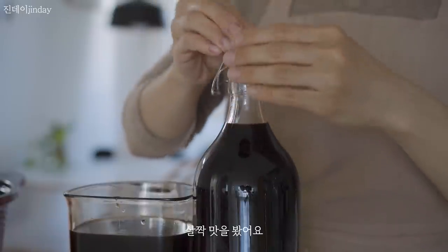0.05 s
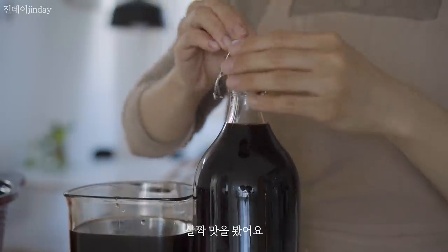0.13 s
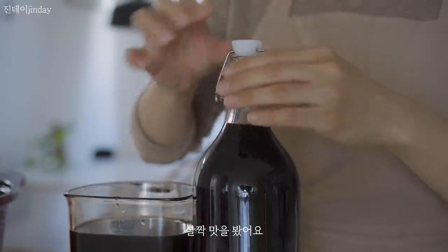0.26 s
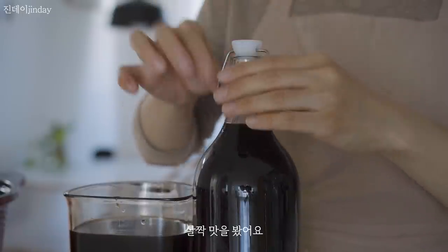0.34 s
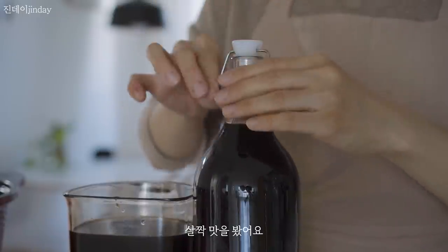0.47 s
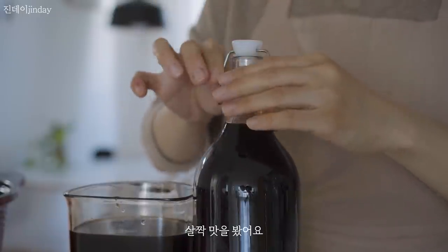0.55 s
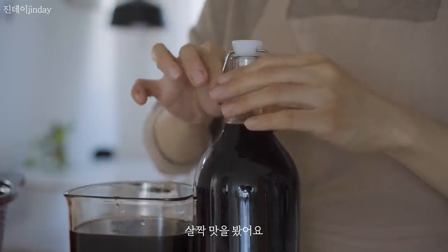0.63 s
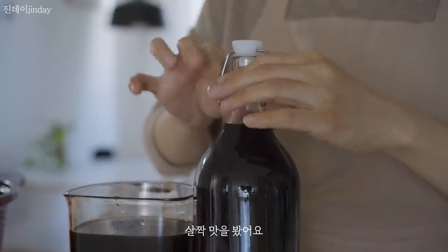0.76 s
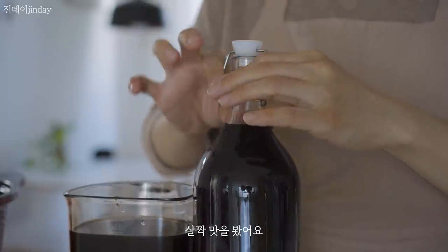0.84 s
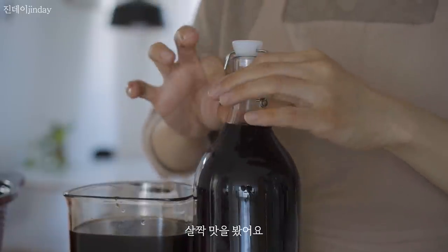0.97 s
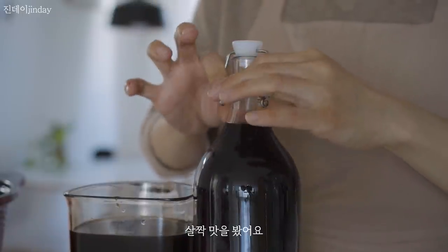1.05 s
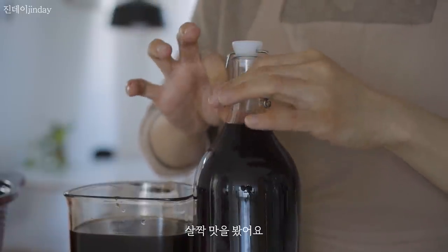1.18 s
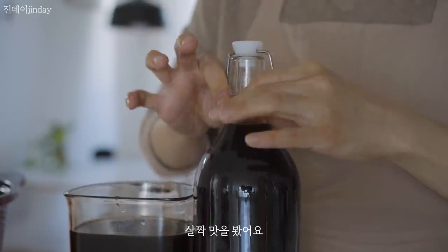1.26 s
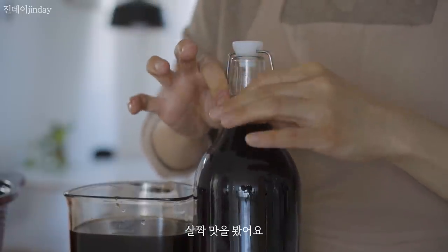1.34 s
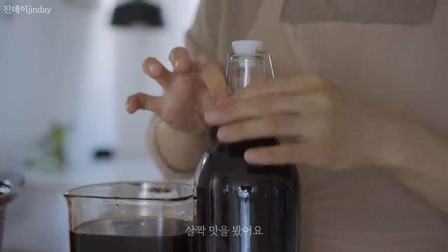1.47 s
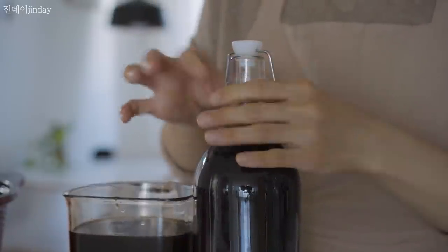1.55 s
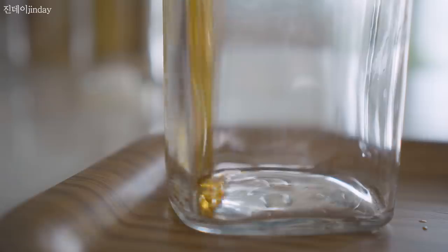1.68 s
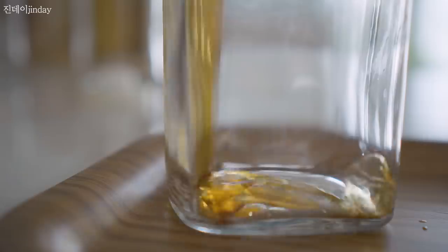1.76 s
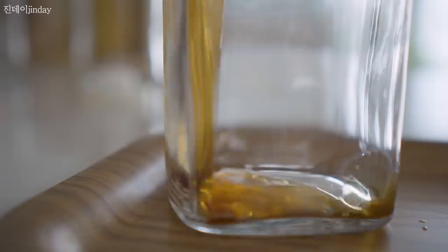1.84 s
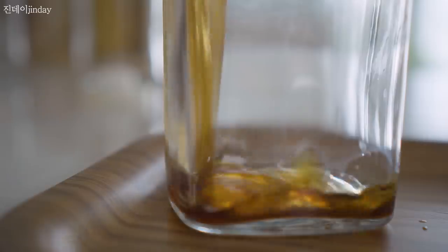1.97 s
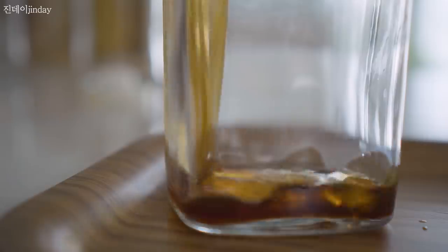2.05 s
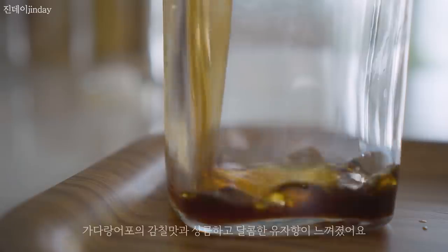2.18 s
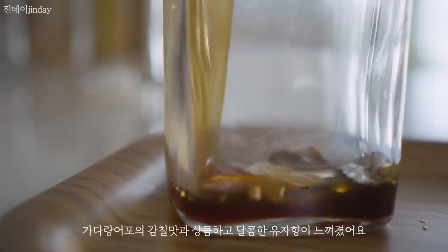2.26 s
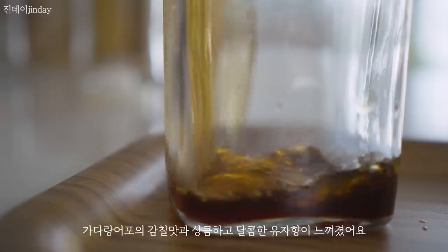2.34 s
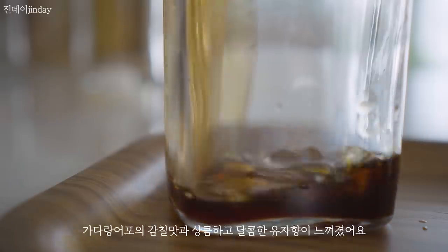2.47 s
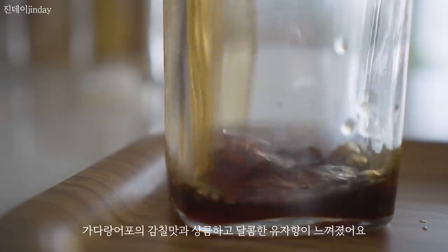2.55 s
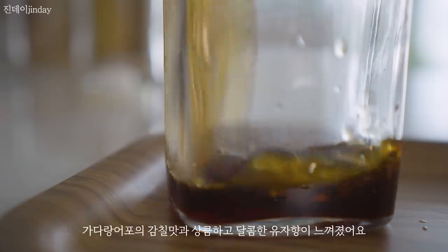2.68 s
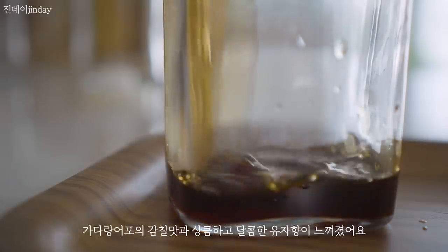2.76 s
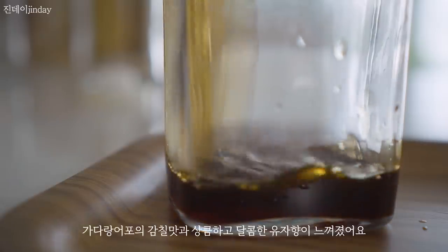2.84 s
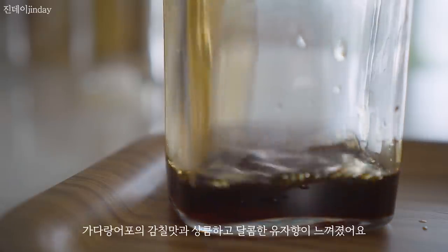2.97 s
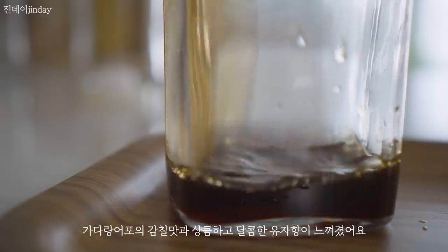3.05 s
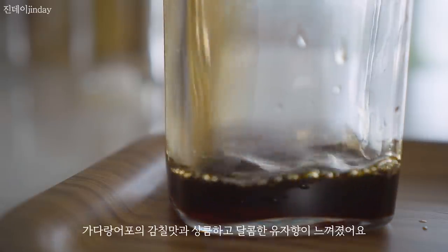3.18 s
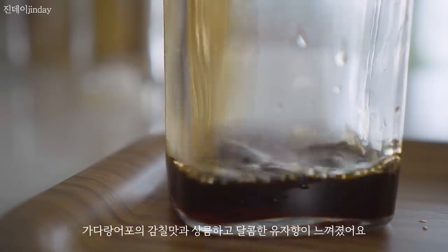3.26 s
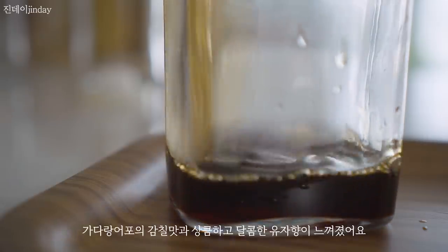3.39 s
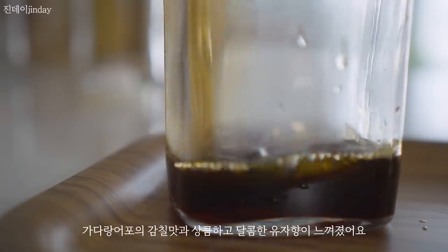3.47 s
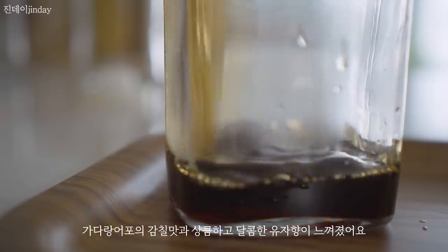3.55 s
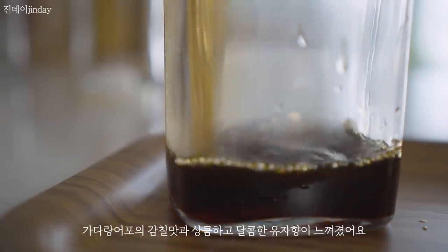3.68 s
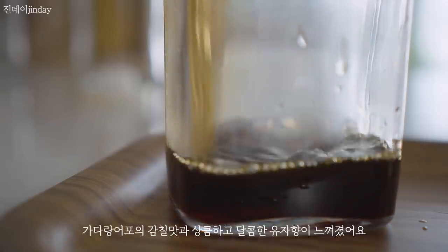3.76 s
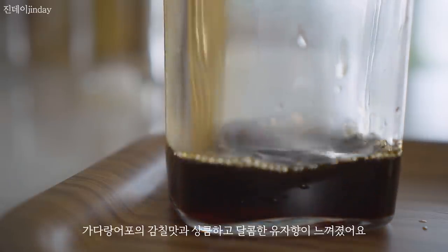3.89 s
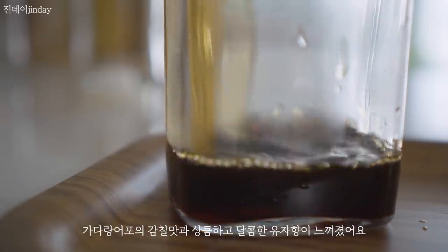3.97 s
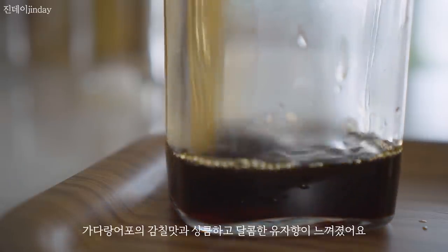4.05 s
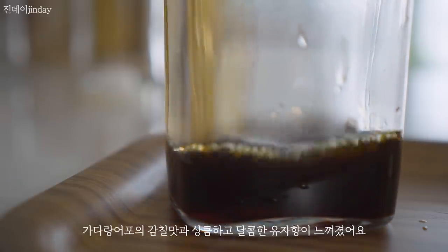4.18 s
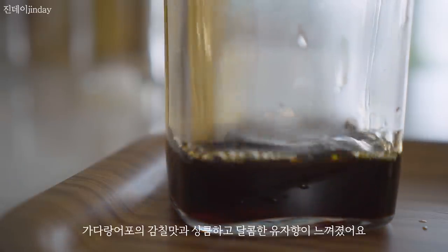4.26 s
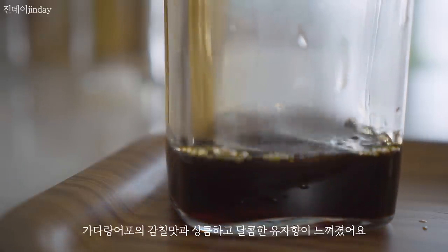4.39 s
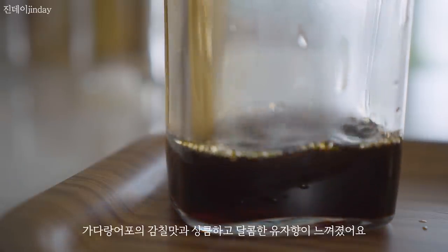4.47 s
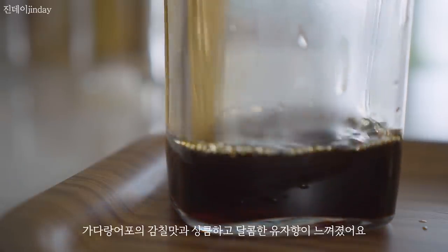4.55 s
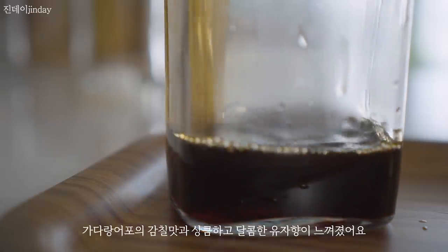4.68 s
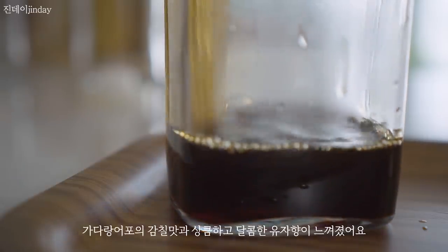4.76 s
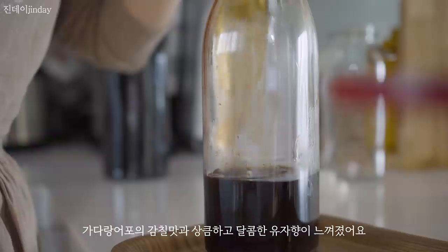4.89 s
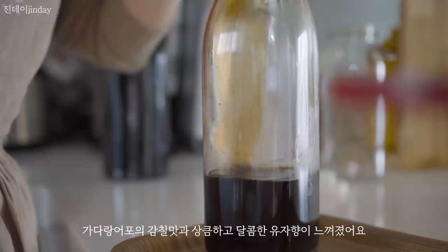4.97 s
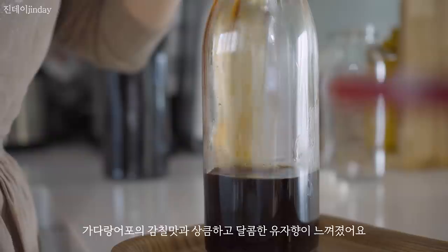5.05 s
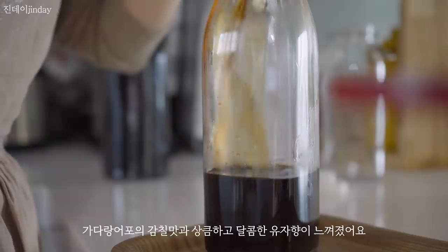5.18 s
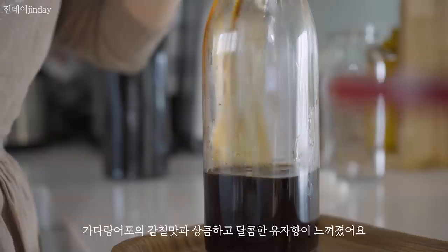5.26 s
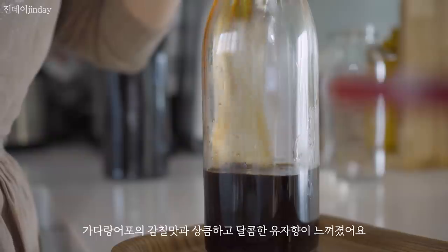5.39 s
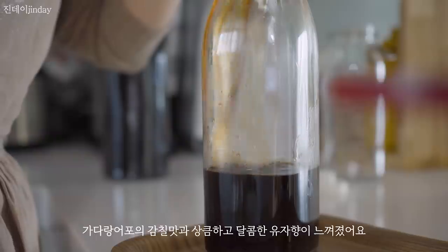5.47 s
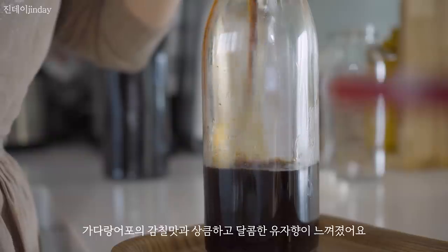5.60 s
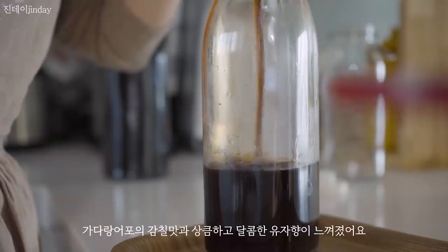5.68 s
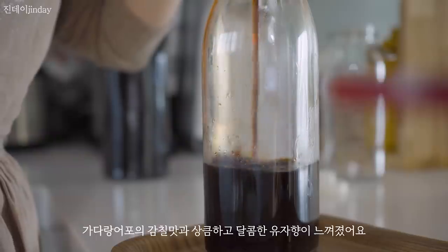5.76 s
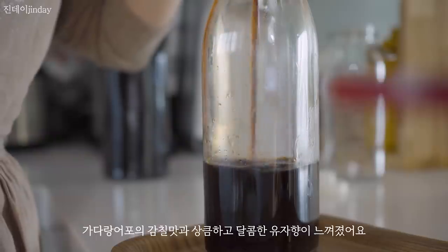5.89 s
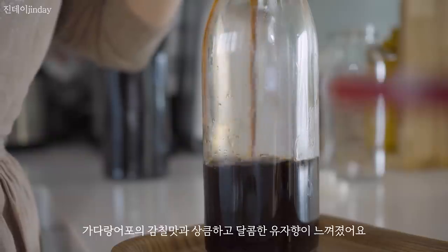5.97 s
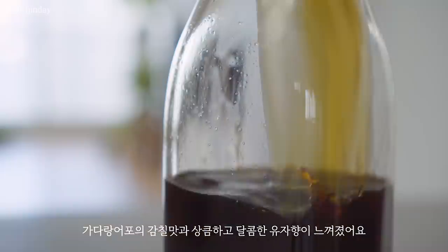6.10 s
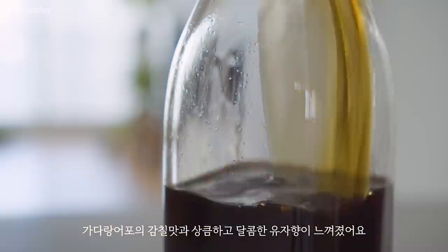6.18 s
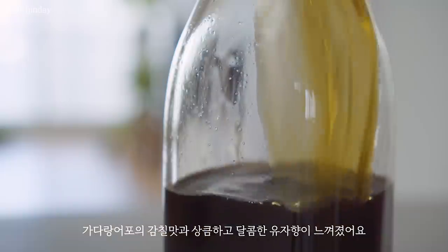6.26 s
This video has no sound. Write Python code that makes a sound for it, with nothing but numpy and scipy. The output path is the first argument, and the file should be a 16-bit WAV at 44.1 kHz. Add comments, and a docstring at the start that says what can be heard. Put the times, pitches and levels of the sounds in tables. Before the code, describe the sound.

A close, quiet kitchen with a low, wavering appliance hum. From 0 to 0.3 s fingers rub faintly on a bottle neck while thin wire ticks against glass, the brightest tick at about 0.26 s. Near silence follows until 1.29 s, when the clasp snaps shut: a hard, overloaded crack, by far the loudest sound, with a small thump, wiry buzz and clear glass ringing. Small clicks follow at 1.5 to 1.65 s. At 1.7 s the hum stops abruptly and liquid splats into an empty square bottle, with watery plinks, droplets, light fizz and hollow glassy resonance, continuing unevenly until 4.9 s. Then a taller bottle is filled: denser bubbling, rounder plops and brisk splashes, strongest from 5.5 to 6.15 s, where a low hollow boom swells under the stream, then drops away as lighter bubbling continues to the end at about 6.3 s.

```python
"""Sauce is poured into a square glass bottle, then into a taller one: a stream splats, bubbles plink and fizz.
Bubbles are gliding, dying sines; splashes are noise bursts with droplet swarms; resonators give the air above.
Before that, the wire clasp of a swing-top bottle is fiddled with and snaps shut against the glass: noise bursts
excite nothing but the ear, while clicks ring the glass modes. A low kitchen hum of wavering sine harmonics lies
under the clasp; coloured noise makes the room, one tone for the clasp and another for the pours."""
import sys
import numpy as np
from scipy import signal
from scipy.fft import rfft, irfft, next_fast_len
from scipy.io import wavfile

SR = 44100
rng = np.random.default_rng(int(sys.argv[2]) if len(sys.argv) > 2 else 0)


def file_out(sig):
    """Save sig as 16-bit WAV at sys.argv[1]."""
    # one column per channel
    cols = np.atleast_2d(sig).T
    # limit, then scale
    lim = np.clip(cols, -1, 1)
    pcm = np.round(lim * 32767).astype(np.int16)
    wavfile.write(sys.argv[1], SR, pcm)


N = 279153
TIME = np.arange(N) / SR


def from_db(db):
    """Amplitude ratio: 20 dB is a factor of ten."""
    return 10 ** (np.asarray(db) / 20)


def rms_one(x):
    """Normalisation to unit root-mean-square amplitude."""
    return x / np.sqrt(np.mean(x ** 2) + 1e-20)


def at_hz(points, hz):
    """Spectral interpolation: level in dB is linear in log frequency."""
    f, db = np.transpose(points)
    return np.interp(np.log(np.maximum(hz, 1)), np.log(f), db)


def noise(spectrum):
    """Spectral shaping: white noise is weighted in the frequency domain, rms 1."""
    size = next_fast_len(N)
    hz = np.arange(size // 2 + 1) * SR / size
    coloured = rfft(rng.standard_normal(size)) * from_db(at_hz(spectrum, hz))
    return rms_one(irfft(coloured, size)[:N])


def drift(rate):
    """Random modulation: a wander through `rate` random knots per second, rms 1."""
    knots = rng.standard_normal(2000)
    return rms_one(np.interp(TIME * rate, np.arange(len(knots)), knots))


def during(start, end):
    """Gating: 1 between two times, with 4 ms ramps against clicks."""
    return np.interp(TIME, [start - .004, start, end - .004, end], [0, 1, 1, 0])


def add(out, s, sound):
    """Superposition: a sound is summed in at its onset."""
    i = max(int(s * SR), 0)
    out[i:i + len(sound)] += sound[:max(N - i, 0)]


def blows(times, levels_db, t60=None):
    """Impulse excitation: a click at each time, or an exponential decay from there."""
    out = np.zeros(N)
    for s, db in zip(times, levels_db):
        add(out, s, from_db([db]))
    if t60 is None:
        return out
    decay = from_db(-60 / (t60 * SR))
    return signal.lfilter([1], [1, -decay], out + 1e-18)


def ring(drive, modes):
    """Modal synthesis: damped resonators in parallel, neighbours in opposite phase."""
    out = np.zeros(N)
    for k, (hz, db, t60) in enumerate(modes):
        radius, angle = from_db(-60 / (t60 * SR)), 2 * np.pi * hz / SR
        poles = [1, -2 * radius * np.cos(angle), radius ** 2]
        out += (-1) ** k * from_db(db) * signal.lfilter([0, np.sin(angle)], poles, drive + 1e-18)
    return out


def echoes(x, t60, dull_hz):
    """Diffuse reverberation: convolution with a unit-energy noise tail whose treble dies twice as fast."""
    t, white = TIME[:SR], rng.standard_normal(SR)
    low = signal.sosfilt(signal.butter(2, min(dull_hz, .45 * SR), fs=SR, output="sos"), white)
    tail = low * from_db(-60 * t / t60) + (white - low) * from_db(-60 * 2 * t / t60)
    tail *= t > .002  # the first reflection comes after 2 ms
    return signal.fftconvolve(x, tail / np.sqrt(np.sum(tail ** 2)))[:N]


# spectra of the room noise [f/Hz, relative level per Hz/dB] and their levels [rms level/dB]
CLASP_ROOM = [(12, -37), (20, -7), (47, 3), (125, -10), (166, -3), (281, -14.5), (361, -10.5), (596, -20.5),
              (745, -19.5), (1040, -26), (1870, -26), (3640, -33.5), (4300, -30.5), (15500, -50)]
POUR_ROOM = [(20, 1.5), (44, 4), (85, -8.5), (125, 0.5), (213, -15.5), (500, -10), (1200, -30.5),
             (3000, -38), (7000, -34.5), (15500, -58)]
CLASP_ROOM_DB, POUR_ROOM_DB = -48.5, -48
CLASP_END_S = 1.692


def clasp_room():
    """Stationary ambient noise: the coloured background around the clasp."""
    return from_db(CLASP_ROOM_DB) * noise(CLASP_ROOM)


def pour_room():
    """Stationary ambient noise: the coloured background around the pours."""
    return from_db(POUR_ROOM_DB) * noise(POUR_ROOM) * (TIME > CLASP_END_S)


# harmonics of the hum [multiple of the mains frequency, rms level before wavering/dB, rms waver/dB]
HUM = [(1, -44.5, 4), (2, -48.5, 0.6), (3, -55, -0.6), (4, -67.5, 1.5), (6, -60.5, 1.4)]
MAINS_HZ, HUM_WAVERS_PER_S = 60, 12
MOTOR_HZ, MOTOR_DB = 53, -49


def hum():
    """Harmonic series and beats: appliance harmonics waver in level; a slower motor beats with the lowest."""
    def line(hz):
        """Pure tone: a sine of rms 1 and random phase."""
        return np.sqrt(2) * np.sin(2 * np.pi * (hz * TIME + rng.random()))
    mains = np.zeros(N)
    for multiple, db, waver_db in HUM:
        mains += from_db(db + waver_db * drift(HUM_WAVERS_PER_S)) * line(round(multiple) * MAINS_HZ)
    return mains + from_db(MOTOR_DB) * line(MOTOR_HZ)


# modes of the glass bottle [f/Hz, relative level/dB, T60/s]
GLASS = [(964, -22, 0.53), (975, -22, 0.35), (1389, -13, 1.1), (2223, -8, 0.71), (2320, -5, 0.4),
         (3273, -18, 0.35), (3397, -8, 0.27), (3445, -6, 0.16), (3494, 0, 0.21), (3526, -6, 0.24),
         (4027, -18, 0.29), (4107, -11, 0.3), (4791, -19, 0.35), (5238, -14, 0.2), (5416, -24, 0.38),
         (5534, -19, 0.29), (5975, -31, 0.36), (6282, -17, 0.24), (6460, -24, 0.23), (7004, -46, 0.78),
         (7483, -29, 0.36), (7736, -30, 0.34), (8376, -23, 0.28), (8710, -18, 0.16), (9345, -20, 0.15),
         (10160, -23, 0.18), (10320, -26, 0.18), (11320, -30, 0.28), (12280, -23, 0.16), (13450, -15, 0.14),
         (13860, -13, 0.11)]
# buzz of wire on glass [f/Hz, relative level per Hz/dB]
BUZZ = [(150, -21), (700, -12), (1200, -21.5), (2100, 5), (2700, -8), (3400, 12), (3800, -15), (4150, -5.5),
        (4500, -8.5), (4850, 11), (5800, -17), (8400, -10), (13500, -20), (16000, -25.5)]
# light contacts of wire and glass [t/s, relative crack level/dB, relative glass ring level/dB]
CLASP = [(.001, -38.5, -47), (0.0382, -53, -42), (0.1038, -28.5, -37), (.169, -58, -51), (0.225, -33, -42),
         (0.237, -26.5, -49), (0.2612, -18.5, -41.5), (.476, -51, -60), (1.476, -26, -66),
         (1.5499, -20.5, -48), (1.623, -34, -52), (1.657, -41, -63)]


def wire_ticks():
    """Impact excitation: light contacts give bright noise bursts, glass modes and a buzz."""
    times, crack_db, ring_db = np.transpose(CLASP)
    # the thin wire alone is bright
    wire = noise([(500, -2), (2200, -18), (3100, 11.5), (4500, -11.0), (8000, -1.0), (15000, -16.5)])
    ticks = from_db(-6) * blows(times, crack_db, t60=0.016) * wire
    # the hand holding the glass damps its low modes
    touched = [(hz, db - 3.5 - 9 * (hz < 3000), t60 * 0.83) for hz, db, t60 in GLASS]
    ticks += ring(blows(times, ring_db), touched)
    return ticks + from_db(-8.5) * blows(times, ring_db, t60=0.16) * noise(BUZZ)


# crack of the snap [f/Hz, relative level per Hz/dB]
CRACK = [(200, -21.5), (900, -6.5), (1900, -9.5), (3000, 4.5), (4200, 1.5), (6000, -11.5), (9000, -4),
         (14000, -9.5), (16000, -18)]
# how strongly the snap reaches the glass modes [f/Hz, level added to the mode/dB]
SNAP_REACH = [(960, -6.5), (1400, -11.5), (2220, -10.5), (2320, -12), (3400, -12.5), (4100, -5.5),
              (4800, -5.5), (5500, -11.5), (8400, -11.5), (11000, -13), (13800, -13.5)]
SNAP_S, SNAP_CRACK_DB = 1.288, 6


def snap():
    """Impulse response: a hard crack, a brief wire buzz, a low thump and the ringing glass modes."""
    crack = blows([SNAP_S], [SNAP_CRACK_DB], t60=0.014) * noise(CRACK)
    buzz = blows([SNAP_S], [-16], t60=0.25) * noise(BUZZ)
    reached = [(hz, db + at_hz(SNAP_REACH, hz), t60) for hz, db, t60 in GLASS]
    glass = ring(blows([SNAP_S], [0]), reached)
    thump = ring(blows([SNAP_S], [-34]), [(72, -2, 0.36), (135, 1, 0.49)])
    return crack + buzz + glass + thump


def fingers():
    """Friction noise: fingers rub unevenly on the neck while they place the stopper."""
    skin = noise([(150, 1), (500, 1), (900, 4), (1500, -1), (4000, -13), (12000, -59)])
    return from_db(-53.5 + 4.5 * drift(43.0)) * during(0, .28) * skin


def clasp():
    """Direct and reverberant field: ticks, snap and rubbing are heard with their reflections."""
    direct = wire_ticks() + snap() + fingers()
    return direct + from_db(-15.5) * echoes(direct, t60=0.35, dull_hz=11050)


# boom of the tall bottle as the stream thickens [t/s, level/dB]
BOOM = [(5.5, -78), (5.58, -59), (5.72, -52), (5.8, -47), (5.87, -44), (6.14, -43.5), (6.17, -69)]
# low resonances of its neck and body [f/Hz, relative level/dB, T60/s]
BOOM_MODES = [(72.7, -2, 0.27), (300.5, 3, 0.13), (360, -6, .1), (680, -4, .08)]


def boom():
    """Forced resonance: uneven noise from the thick stream wakes the tall bottle's low modes."""
    level = from_db(np.interp(TIME, *np.transpose(BOOM), left=-120))
    drive = rng.standard_normal(N) * from_db(3.8 * drift(45))
    return level * rms_one(ring(drive, BOOM_MODES))


def bubble(hz, t60, rise, swell_cycles):
    """Bubble resonance: a sine swells, decays and climbs in pitch as the bubble nears the surface."""
    t = TIME[:int(t60 * SR) + 2]
    phase = 2 * np.pi * hz * t * (1 + rise * (t / t60 - .3) / 2)
    return np.sin(phase) * from_db(-60 * t / t60) * (1 - np.exp(-t * hz / swell_cycles))


def fizz(span, spectrum, low_hz, high_hz, per_s, spread_db, cycles):
    """Incoherent superposition: a swarm of random bubbles, larger ones gliding more; rms 1 in the span."""
    out, length = np.zeros(N), span[1] - span[0]
    when, size, strength, life = rng.random((int(per_s * length), 4)).T
    pitches = low_hz * (min(high_hz, .45 * SR) / low_hz) ** size
    # the factor of pitch offsets the log-spaced pitches and the shorter lives of small bubbles
    strength_db = spread_db * np.minimum(-np.log(strength), 2.5)
    gains = pitches * from_db(at_hz(spectrum, pitches) + strength_db)
    lives_s = cycles * (.5 + life) / pitches
    for s, hz, gain, t60 in zip(span[0] + when * length, pitches, gains, lives_s):
        add(out, s, gain * bubble(hz, t60, rise=25 / hz, swell_cycles=0.19))
    return rms_one(out) * np.sqrt(length * SR / N)


def within(span, rows):
    """Temporal windowing: the events whose onset lies in one pour."""
    return [row for row in rows if span[0] <= row[0] < span[1]]


LESSER_PER_S, LESSER_SPREAD_DB = 12, 1.5
LESSER_LOW_HZ, LESSER_HIGH_HZ = 1306, 7240


def lesser_events(stream):
    """Jittered point process: air is caught at uneven intervals, at levels that follow the bubbling."""
    s, _, bubbling_db, _ = np.transpose(stream)
    when, size, strength = rng.random((200, 3)).T
    times = s[0] + (np.arange(len(when)) + when) / LESSER_PER_S
    pitches = LESSER_LOW_HZ * (LESSER_HIGH_HZ / LESSER_LOW_HZ) ** size
    levels_db = np.interp(times, s, bubbling_db) + LESSER_SPREAD_DB * (2 * strength - 1)
    return np.array([times, pitches, levels_db])[:, times < s[-1]]


# large air bubbles caught by the stream [t/s, f/Hz, relative level/dB, T60/s]
PLOPS = [(1.771, 5500, -29, .025), (2.139, 1706, -41.5, 0.1), (2.2, 2036, -31, .035),
         (2.22, 2190, -22, .025), (2.316, 1076, -37.5, .04), (2.369, 814, -32.5, 0.04),
         (2.39, 866, -37, .045), (2.435, 2213, -25, 0.028), (2.477, 1480, -37.5, 0.032),
         (2.529, 2890, -35, 0.05), (2.57, 2860, -30, 0.064), (2.592, 1696, -34.5, 0.034),
         (2.61, 875, -36.5, 0.093), (2.744, 1380, -36.5, 0.024), (2.877, 2090, -30, 0.039),
         (2.895, 8180, -37, 0.035), (3.064, 2990, -33, 0.044), (3.291, 2261, -36, 0.024),
         (3.472, 4290, -35.5, 0.033), (3.592, 2245, -32, .03), (3.605, 2000, -34.5, 0.028),
         (3.692, 1670, -38, .03), (4.039, 1825, -31.5, .11), (4.141, 2090, -34, 0.037),
         (4.147, 3090, -31.5, 0.036), (4.169, 3120, -24, 0.024), (4.271, 950, -37.5, 0.035),
         (4.53, 4600, -34.5, 0.028), (4.677, 4230, -36.5, 0.071), (4.872, 1798, -36, .18),
         (4.94, 3100, -39, 0.036), (5.038, 5890, -33.5, 0.089), (5.173, 1020, -38.5, 0.027),
         (5.211, 1593, -29, .08), (5.232, 1940, -21.5, 0.024), (5.295, 1713, -30, 0.054),
         (5.41, 750, -37.5, .08), (5.47, 2927, -26.5, .045), (5.538, 2950, -30.5, 0.075),
         (5.559, 1627, -20, .05), (5.598, 687, -18, 0.031), (5.627, 1093, -24.5, .045),
         (5.646, 1137, -32, 0.058), (5.653, 640, -30.5, 0.038), (5.672, 2660, -24.5, 0.023),
         (5.715, 1660, -27, 0.04), (5.76, 1810, -32.5, 0.043), (5.801, 1760, -34, 0.037),
         (5.837, 291, -24.5, 0.052), (5.879, 1485, -26, 0.033), (5.999, 1504, -22.5, 0.065),
         (6.043, 3080, -22.5, 0.014), (6.087, 1491, -18, 0.048), (6.129, 661, -33, 0.058),
         (6.142, 1630, -33, .025), (6.169, 2020, -32, 0.033), (6.202, 3910, -38.5, 0.049),
         (6.239, 2720, -37, 0.056), (6.269, 1830, -27.5, .02)]
LESSER_PLOP_DB, LESSER_T60_S = 6, 0.058  # level relative to the lesser event


def plops(span, lesser, satellite_db):
    """Bubble fragmentation: each large bubble sheds three weaker ones of other sizes just after it."""
    out = np.zeros(N)
    rows = within(span, PLOPS)
    rows += [(s, hz, db + LESSER_PLOP_DB, LESSER_T60_S) for s, hz, db in zip(*lesser)]
    for s, hz, db, t60 in rows:
        add(out, s, from_db(db + 1.5) * bubble(hz, t60, rise=0.033, swell_cycles=2.26))
        for delay, size, strength in rng.random((3, 3)):
            other = bubble(hz * 2 ** (1.7 * (size - .5)), t60 * 0.63, rise=0.016, swell_cycles=0.79)
            add(out, s + .018 * delay, from_db(db + satellite_db - 8.1 * strength) * other)
    return out


SLAP_DB, SLAP_T60_S, SLAP_WIDTH_OCTAVES = -7.5, 0.019, 0.83  # level relative to the splash


def slaps(rows):
    """Band-limited impact noise: each slap is a very short hiss around a pitch of its own."""
    out, t = np.zeros(N), TIME[:SR // 20]
    for s, hz, db in rows:
        edges = np.clip(hz * 2 ** (SLAP_WIDTH_OCTAVES * np.array([-.5, .5])), 100, .45 * SR)
        band = signal.butter(2, edges, "band", fs=SR, output="sos")
        hiss = rms_one(signal.sosfilt(band, rng.standard_normal(len(t))))
        add(out, s, from_db(db + SLAP_DB - 60 * t / SLAP_T60_S) * hiss)
    return out


# the stream slaps the surface [t/s, centre f/Hz, relative level/dB]
SPLASHES = [(1.752, 5960, -33.5), (1.77, 5050, -22), (2.201, 3000, -29), (2.296, 5070, -30.5),
            (2.436, 3200, -31.5), (2.501, 5500, -33.5), (2.528, 3500, -36), (2.615, 4870, -28.5),
            (3.083, 5000, -23), (3.17, 6500, -39.5), (3.425, 4600, -29.5), (3.606, 3560, -37),
            (3.641, 6400, -29), (4.039, 2930, -31), (4.08, 4050, -27.5), (4.146, 3470, -27),
            (4.367, 5500, -30.5), (4.742, 4500, -36), (4.851, 4960, -31.5), (5.041, 5500, -33.5),
            (5.095, 3970, -28), (5.264, 4960, -23), (5.353, 7000, -31), (5.392, 4500, -31),
            (5.561, 4500, -22), (5.579, 6200, -29), (5.598, 6040, -28.5), (5.627, 3480, -24),
            (5.646, 3950, -25), (5.761, 3000, -30.5), (5.877, 5000, -33), (5.919, 6430, -33),
            (6.044, 4060, -23.5), (6.168, 6150, -30.5)]
# droplets thrown up by a splash [f/Hz, relative level per Hz/dB]
DROPLETS = [(1000, -19), (2500, 5.5), (5500, 5.5), (9000, 3.5), (15000, -42)]
LESSER_SPLASH_DB = 9.5  # relative to the lesser event


def splashes(span, lesser):
    """Impact and droplet cascade: a slap of noise is followed by a dying shower of small bubbles."""
    when, pitches, size_db = lesser
    # a lesser splash lies an octave above its bubble
    rows = within(span, SPLASHES) + list(zip(when, 2 * pitches, size_db + LESSER_SPLASH_DB))
    times, _, splash_db = np.transpose(rows)
    droplets = fizz(span, DROPLETS, 1200, 14930, per_s=800, spread_db=6, cycles=58)
    shower = from_db(-16.0) * blows(times, splash_db, t60=0.072) * droplets
    return slaps(rows) + shower


# bubbles burst at the surface and set the air ringing [t/s, relative level/dB]
BURSTS = [(2.528, -34.5), (2.572, -36), (2.609, -40), (2.858, -40), (3.259, -37), (3.425, -37.5),
          (3.473, -39.5), (3.722, -37.5), (3.907, -40), (4.039, -35.5), (4.147, -42), (4.233, -40.5),
          (4.744, -38), (4.873, -28.5), (5.039, -43.5), (5.095, -40), (5.232, -36.5), (5.559, -33.5),
          (5.598, -36), (5.629, -37)]
LESSER_BURST_DB = -2  # relative to the lesser event
BURST_SOFT_HZ = 3700  # a burst is a soft push: it reaches the air modes above this less


def bottle_air(span, lesser, air_modes, wet, air_db):
    """Cavity resonance: bursts and the wet sounds excite the modes of the air above the liquid."""
    when, _, size_db = lesser
    rows = within(span, BURSTS) + list(zip(when, size_db + LESSER_BURST_DB))
    times, burst_db = np.transpose(rows)
    air = np.zeros(N)
    soft = signal.butter(2, min(BURST_SOFT_HZ, .45 * SR), fs=SR, output="sos")
    for hz, db, t60 in air_modes:
        # each bubble bursts elsewhere, so it reaches the weaker air modes by chance
        chance_db = min(db, 0) * (rng.random(len(times)) - .3)
        push = signal.sosfilt(soft, blows(times, burst_db + chance_db) + 1e-18)
        air += ring(push + from_db(air_db) * wet, [(hz, db, t60)])
    return air


# low bubbles of the gurgle [f/Hz, relative level per Hz/dB]
GURGLE = [(76, -33), (130, 7.5), (242, -6), (285, 4.5), (401, -10.5), (683, -9.5), (900, -12.5),
          (1170, -42), (1980, -120)]


def pour(span, stream, air_modes, spectrum, air_db, bubbling_db, spray_db, wash_db, gurgle_db, lesser_db):
    """Source and resonator: bubbles and splashes sound directly, echo between the walls and ring the air."""
    s, *levels = np.transpose(stream)
    gurgle, bubbling, spray = [from_db(np.interp(TIME, s, db, left=-70)) for db in levels]
    low_bubbles = fizz(span, GURGLE, 171, 1040, per_s=200, spread_db=3.0, cycles=12.0)
    churn = gurgle * from_db(gurgle_db) * low_bubbles
    mid_bubbles = fizz(span, spectrum, 726, 4680, per_s=480, spread_db=8, cycles=45)
    high_bubbles = fizz(span, spectrum, 3987, 15180, per_s=380, spread_db=5, cycles=260)
    small = bubbling * from_db(bubbling_db) * mid_bubbles + spray * from_db(spray_db) * high_bubbles
    # the jet tears the surface in quick uneven spurts
    spurts = rms_one(from_db(7.0 * drift(160)))
    small += np.sqrt(bubbling * spray) * from_db(wash_db) * spurts * noise(spectrum)
    when, pitches, size_db = lesser_events(stream)
    lesser = when, pitches, size_db + lesser_db
    large = plops(span, lesser, satellite_db=-8.5)
    wet = small + splashes(span, lesser)
    air = bottle_air(span, lesser, air_modes, wet, air_db)
    inside = from_db(-5) * echoes(wet, t60=0.089, dull_hz=12200)
    inside += from_db(-11.5) * echoes(large, t60=0.28, dull_hz=9100)
    return (churn + wet + large + air + inside) * during(*span)


# the square bottle's pour [start t/s, end t/s]
SQUARE_POUR = (1.7, 4.904)
# its stream [t/s, relative gurgle level/dB, relative bubbling level/dB, relative spray level/dB]
SQUARE_STREAM = [(1.72, -46.5, -66, -59), (1.89, -52, -64.5, -67), (2.12, -50, -65, -56),
                 (2.39, -49, -52.5, -65.5), (2.7, -59.5, -55, -49.5), (3.23, -53, -55, -63),
                 (3.96, -60, -54, -53.5), (4.29, -59, -52.5, -61.5), (4.68, -51, -50.5, -64),
                 (4.88, -54, -53, -68)]
# modes of the air above its liquid [f/Hz, relative level/dB, T60/s]
SQUARE_AIR = [(867, -17, .15), (1790, -7, .17), (2075, -16, .1), (2674, 0, .17), (2838, -12, .12),
              (2945, -12, .12), (3068, -13, .15), (4122, -12, .18), (5380, -18, .1), (6720, -18, .13),
              (7000, -15, .15), (7710, -17, .14), (8170, -17, .14), (9500, -19, .12)]
# loudness of its bubbles by pitch [f/Hz, relative level per Hz/dB]
SQUARE_FIZZ = [(410, -46), (700, -18), (861, -7.5), (1270, -9.5), (1730, -6), (2460, -10), (2730, 7.5),
               (3630, -19.5), (4230, -13), (4580, -19), (15500, -27)]


def square_pour():
    """Cavity excitation: the stream fills the square bottle and rings its own air modes."""
    return pour(SQUARE_POUR, SQUARE_STREAM, SQUARE_AIR, SQUARE_FIZZ, air_db=-37.5, bubbling_db=-4.5,
                spray_db=-2.5, wash_db=-8.5, gurgle_db=-3.5, lesser_db=1.5)


# the tall bottle's pour [start t/s, end t/s]
TALL_POUR = (4.904, 6.34)
# its stream [t/s, relative gurgle level/dB, relative bubbling level/dB, relative spray level/dB]
TALL_STREAM = [(5.05, -58, -53, -51), (5.244, -54, -45.5, -61), (5.37, -52, -49, -52.5),
               (5.548, -55.5, -47, -54.5), (5.718, -46.5, -43.5, -50.5), (5.912, -44.5, -43.5, -70),
               (6.018, -45.5, -46.5, -63), (6.17, -50.5, -49.5, -51), (6.32, -70, -52, -77)]
# modes of the air above its liquid [f/Hz, relative level/dB, T60/s]
TALL_AIR = [(1600, 0, .13), (1990, -8, .1), (2460, -3, .14), (2760, -6, .12), (2895, -3, .14),
            (3220, -7, .15), (3960, -12, .12), (4490, -8, .12), (5400, -12, .1), (5950, -12, .12),
            (7530, -15, .1)]
# loudness of its bubbles by pitch [f/Hz, relative level per Hz/dB]
TALL_FIZZ = [(410, -40), (700, -18), (872, -5), (1300, -14.5), (1520, 5), (2160, -12.5), (2830, -4.5),
             (4180, -17.5), (6090, -13.5), (11300, -30), (15500, -23.5)]


def tall_pour():
    """Cavity excitation: the stream fills the taller bottle and rings its own air modes."""
    return pour(TALL_POUR, TALL_STREAM, TALL_AIR, TALL_FIZZ, air_db=-41, bubbling_db=-4.5,
                spray_db=-2, wash_db=-7.0, gurgle_db=-0.5, lesser_db=-2.5)


def scene():
    """Linear superposition: first the clasp in a humming room, then the two pours."""
    closing = (clasp_room() + hum() + clasp()) * during(0, CLASP_END_S)
    pouring = pour_room() + boom() + square_pour() + tall_pour()
    return (closing + pouring)[None]


CUTOFF_HZ = 15650


def record(dry):
    """Clipping and band limiting: the snap overloads the input, and a steep low-pass cuts the top."""
    low_pass = signal.ellip(10, .1, 80, CUTOFF_HZ, fs=SR, output="sos")
    return signal.sosfilt(low_pass, np.clip(dry, -1, 1))


dry = scene()
out = record(dry)
file_out(out)
```